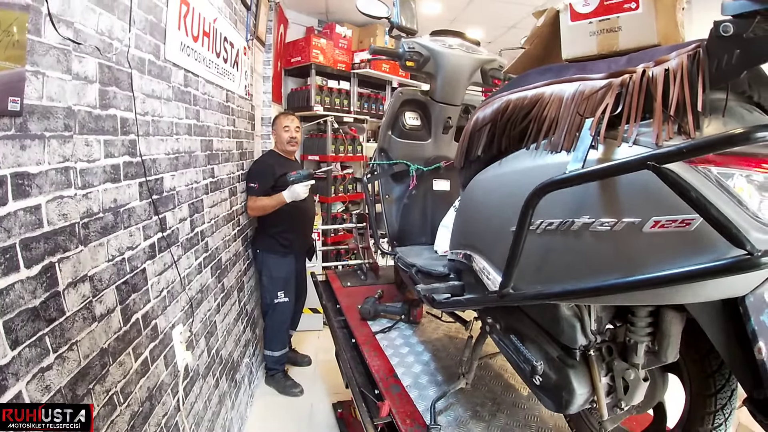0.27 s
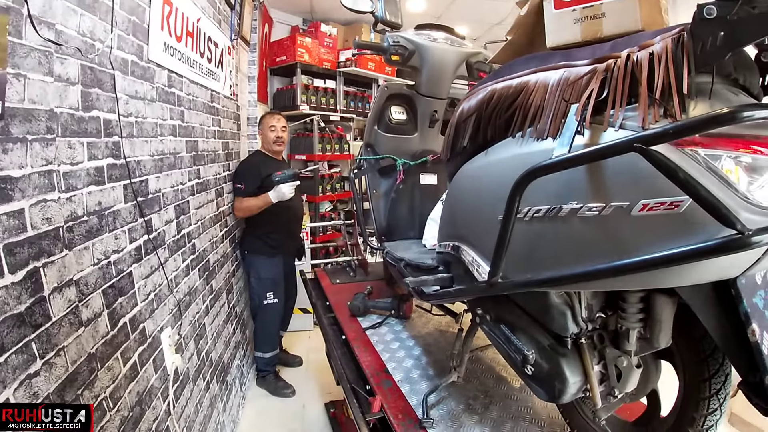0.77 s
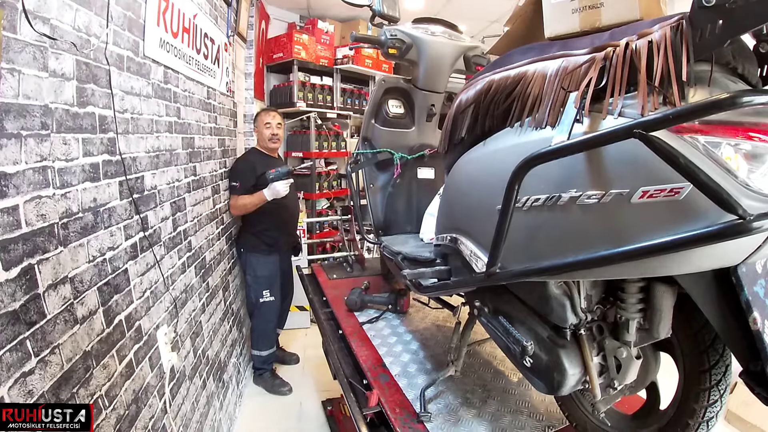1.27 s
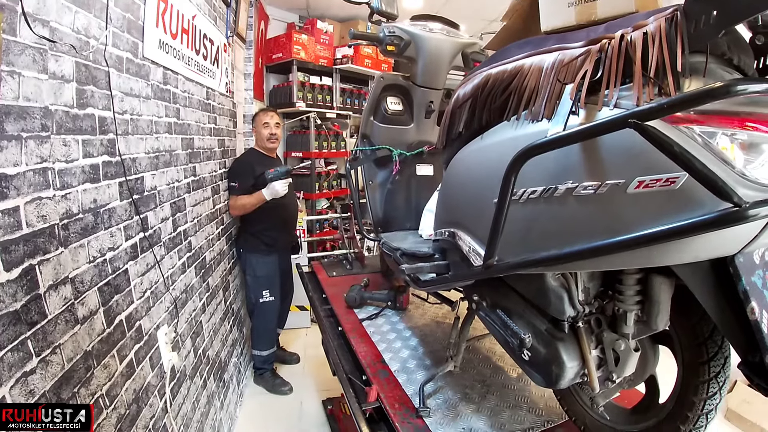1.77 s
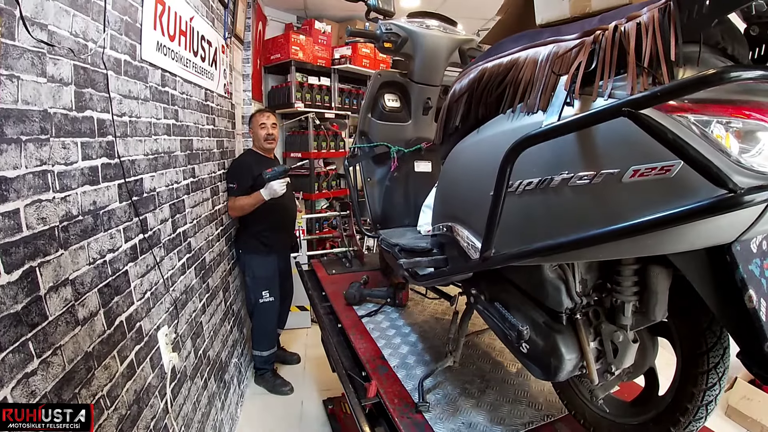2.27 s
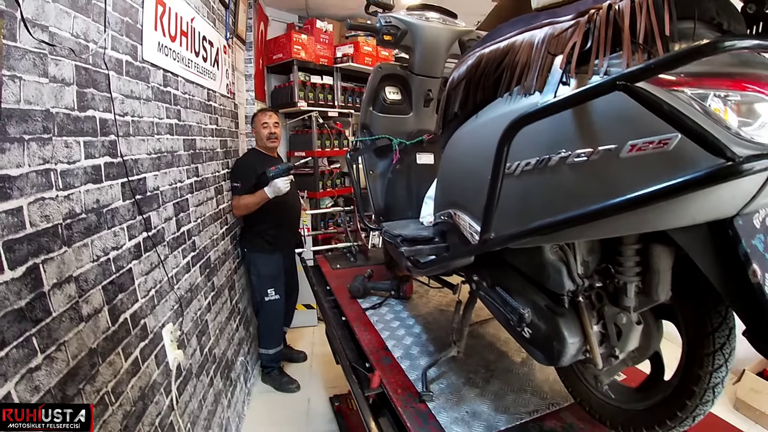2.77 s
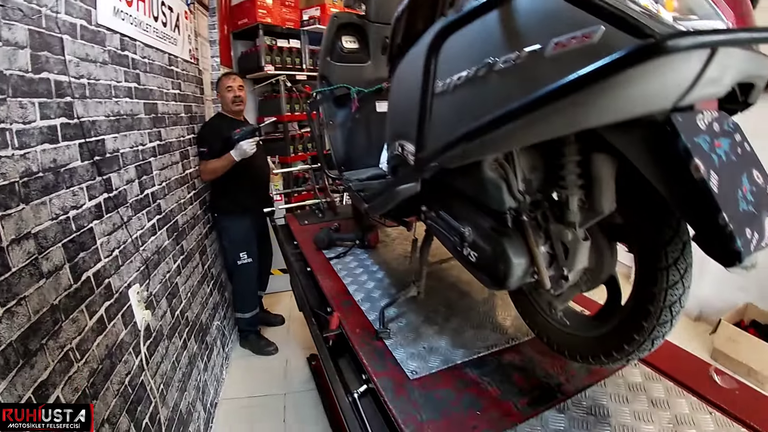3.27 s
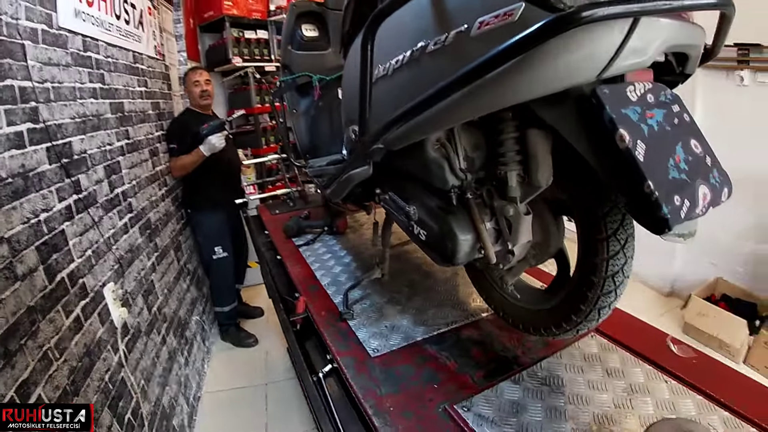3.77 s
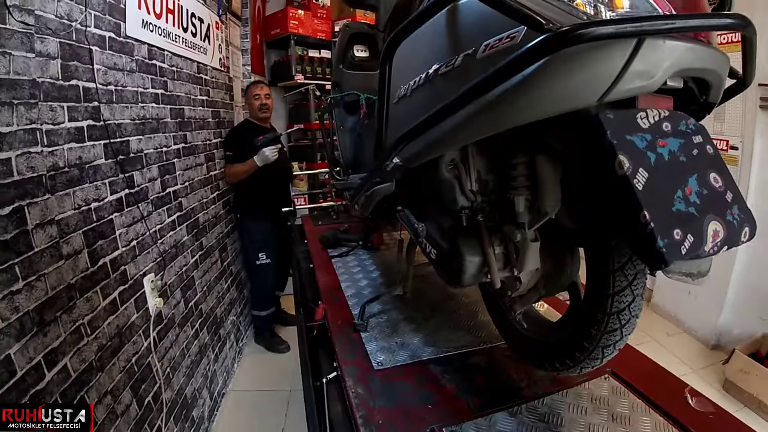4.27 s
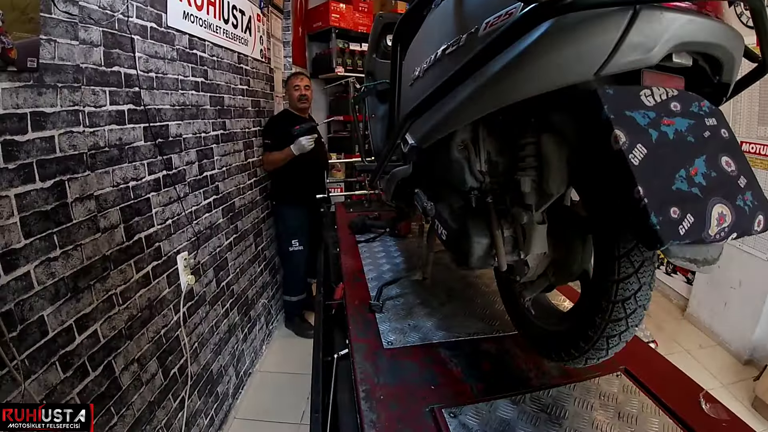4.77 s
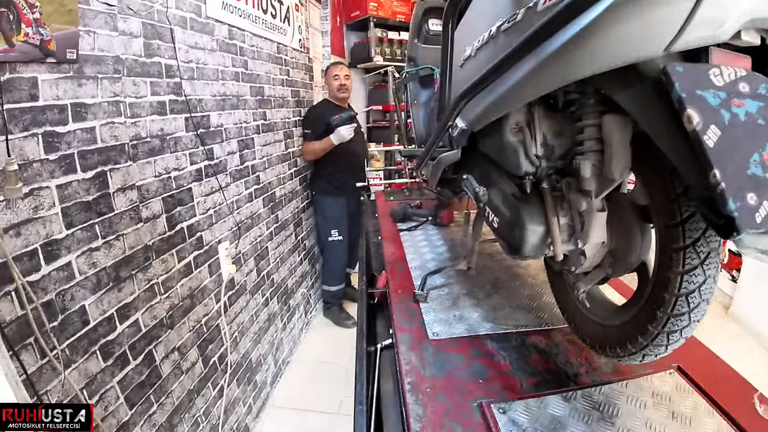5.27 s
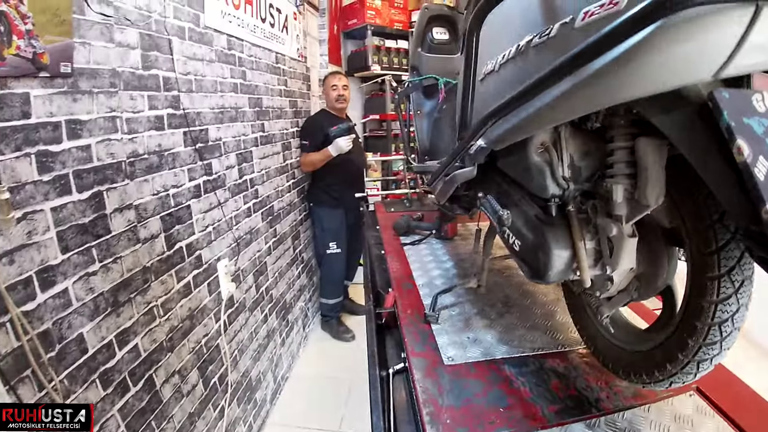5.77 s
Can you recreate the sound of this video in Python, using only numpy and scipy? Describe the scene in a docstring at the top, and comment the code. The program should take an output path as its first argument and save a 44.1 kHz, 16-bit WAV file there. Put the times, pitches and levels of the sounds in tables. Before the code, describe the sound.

In a small workshop, an electric hydraulic pump is already running and never stops. A strong low mains hum sits under a raspy, rapidly repeating gear buzz, a thin high whine and a hiss of oil. Deep rumble wavers underneath. The microphone is carried around nearby, so after about three seconds the tone colour shifts more quickly while pitch stays fixed.

```python
"""In a small workshop, the electric pump of a hydraulic lift runs steadily, raising a scooter.
The motor's iron hums at twice the mains rate and its multiples, as summed cosines. Its shaft turns a
nine-tooth gear pump: a repeated random turn makes the buzz, shaft-locked partials make the whine.
Shaped noise gives the hiss of oil, the swelling bands and a low rumble with unsteady drones.
The microphone is carried through the room's standing waves, so partials rise and dip along the way."""
import sys
import numpy as np
from scipy import signal
from scipy.fft import rfft, irfft, next_fast_len
from scipy.io import wavfile

SR = 44100
rng = np.random.default_rng(int(sys.argv[2]) if len(sys.argv) > 2 else 0)


def materialize(psi):
    """Save the field psi as 16-bit PCM at rate SR to the path in sys.argv[1].

    A 1-D psi becomes a single channel; in a 2-D psi each row is a channel.
    """
    bounded = np.clip(np.atleast_2d(psi).T, -1, 1)
    quanta = np.round(bounded * 32767).astype(np.int16)
    wavfile.write(sys.argv[1], SR, quanta)


N = 265305
TIME = np.arange(N) / SR
PADDED = next_fast_len(N)
BINS = np.fft.rfftfreq(PADDED, 1 / SR)  # Hz
SHAFT_HZ, TEETH = 24.848, 9  # mean speed of the pump shaft, teeth on its gear


def motor(mains_hz=50.0, waver_db=0.27, steady_db=0.06):
    """Magnetic pull peaks with each crest of the current; the room smears the upper partials of that pulse."""
    # hum partials at two spots in the standing waves:
    # (multiple of the mains rate, first spot [dB], second spot [dB], crossing time [s])
    hum = [(2, -24, -24.5, 4.0), (4, -23.4, -22, 4.2), (6, -45.5, -50.5, 3.4), (8, -36, -44.5, 3.94),
           (10, -40, -42, 4), (12, -53, -47, 3.9), (14, -57.5, -56.5, 3.6), (16, -48.5, -59.5, 3.93),
           (20, -51, -53.5, 4.0)]
    # faint steady-pitched upper hum: (frequency [Hz], mean level [dB])
    upper_hum = [(900, -63), (1100, -63), (1200, -66), (1300, -63), (1400, -68), (1500, -66), (1600, -69),
                 (1700, -70)]
    # nodes (-) and crests (+) that the microphone passes:
    # (time [s], half length [s], multiple of the mains rate, change [dB])
    nodes = [(0, .5, 2, -1.5), (2.5, 0.35, 14, -10), (3.3, .45, 2, 1), (3.45, 0.21, 10, -8),
             (4.0, .35, 14, 6), (4.03, 0.21, 20, -8.5), (5.5, 0.19, 16, 9.5), (5.6, .2, 2, .7)]
    angle = 2 * np.pi * mains_hz * TIME - np.pi / 2
    out = np.zeros(N)
    for order, first_db, second_db, s in hum:
        order = round(order)
        if order < 5:
            # the low partials lag a little in the heavy frame
            smear = -(order - 2) / 4
            waver = steady_db * drift(3.2)
        else:
            # the higher ones arrive ever more scattered
            smear = (order / 14) ** 2 * rng.standard_normal() + 0.12 * drift(2)
            waver = waver_db * (drift(14.0) - hunting())
        level_db = crossing(first_db, second_db, s) + passed(nodes, order) + waver
        out += amp(level_db) * np.cos(order * angle + smear)
    for hz, db in upper_hum:
        out += amp(db + 2 * drift(0.52)) * np.cos(2 * np.pi * (hz * TIME + rng.random()))
    return np.sqrt(2) * out  # table levels are rms


def hunting(hunt_hz=1.49, peak_s=0.67):
    """The rotor slips behind the field, so load and speed rock slowly to and fro."""
    return np.cos(2 * np.pi * hunt_hz * (TIME - peak_s))


def shaft_turns(depth=0.00055, jitter=0.00018):
    """Turns of the shaft since the start; hunting and chance move its speed by small fractions."""
    return np.cumsum(SHAFT_HZ * (1 + depth * hunting() + jitter * drift(5.3))) / SR


def gear_pressure(turns, once=0.077, twice=0.16):
    """Slightly eccentric gears press harder once and twice a turn."""
    return 1 + once * np.cos(2 * np.pi * turns) + twice * np.sin(2 * np.pi * 2 * turns)


def gear_buzz(turns, size=8192, count=8, steady=0.32, mesh_db=2):
    """The teeth scrape the same way on every turn; the room reweights each order as the microphone moves."""
    # buzz through the pump casing, before the tooth boost: (frequency [Hz], level [dB per Hz])
    casing = [(300, -74.5), (550, -85), (1000, -92), (1500, -88.5), (2050, -89), (2600, -84), (3100, -80.5),
              (3550, -80), (4250, -83.5), (4650, -92.5), (6700, -94), (7900, -94.5), (8700, -103.2),
              (10300, -104)]
    orders = np.arange(size // 2 + 1)  # multiples of the shaft rate
    gain = colour(casing, orders * SHAFT_HZ)
    gain *= amp(mesh_db * (orders % TEETH == 0))
    # nothing up to the tooth rate, and a steep upper edge in Hz
    gain *= (orders > TEETH) / (1 + (orders * SHAFT_HZ / 10800) ** 40)
    travelled = path()

    def play(pattern):
        """Repeats one turn of the shaft."""
        turn = irfft(gain * pattern, size) * size * np.sqrt(SHAFT_HZ / 2)
        return np.interp(turns % 1 * size, np.arange(size + 1), np.append(turn, turn[0]))

    direct = play(np.exp(2j * np.pi * rng.random(len(orders))))
    diffuse = np.zeros(N)
    for place in range(count):
        real, imaginary = rng.standard_normal((2, len(orders))) / np.sqrt(2)
        diffuse += nearness(travelled, place) * play(real + 1j * imaginary)
    return np.sqrt(steady) * direct + np.sqrt(1 - steady) * diffuse  # steady: share of power


def gear_whine(turns, trim_db=-0.5, fade_db=2.2, count=24):
    """Tooth-mesh partials and their neighbours, locked to the shaft, fading faster as the microphone moves faster."""
    # partials at two spots, before the trim, most on multiples of the tooth rate:
    # (multiple of the shaft rate, first spot [dB], second spot [dB], crossing time [s])
    whine = [(9, -42.5, -47, 3.3), (99, -73, -63.5, 3.8), (108, -61, -71, 2.8), (117, -60, -63, 2.4),
             (126, -66, -59.5, 3.2), (135, -63, -62, 3.0), (141, -64, -65, 3.0), (144, -58, -62, 2.2),
             (149, -65, -66, 4.0), (171, -73, -70, 3.5)]
    # crests that the microphone passes: (time [s], half length [s], multiple of the shaft rate, rise [dB])
    crests = [(1.45, .3, 144, 4), (3.75, .3, 141, 11), (4.1, .3, 126, 4), (5.4, .3, 171, 14),
              (5.65, .25, 149, 12)]
    out = np.zeros(N)
    steps = 3 * path()  # the whine's standing waves are short
    for order, first_db, second_db, s in whine:
        fade = fade_db * np.interp(steps, np.arange(count), rng.standard_normal(count))
        level_db = trim_db + crossing(first_db, second_db, s) + passed(crests, order) + fade
        out += amp(level_db) * np.cos(2 * np.pi * (order * turns + rng.random()))
    return np.sqrt(2) * out


def oil(turns, throb=0.18, flicker_db=0.5):
    """Oil hisses through the pump in spurts, one for each tooth."""
    # mean colour of the hiss: (frequency [Hz], level [dB per Hz])
    flow = [(150, -74.5), (250, -77.5), (420, -69), (560, -73.5), (780, -77), (950, -79), (1400, -81),
            (2000, -86.5), (3000, -87.5), (4200, -92), (4700, -94), (7700, -94), (8700, -104.5),
            (10400, -106.5), (11300, -117), (14000, -122)]
    spurts = 1 + throb * np.cos(2 * np.pi * TEETH * turns)
    return noise(colour(flow, BINS)) * spurts * amp(flicker_db * drift(25))


def near_walls(x, count=16, echoes=6):
    """Echoes off wall, deck and scooter comb the treble, differently at each half step of the path."""
    travelled = 2 * path()
    spectrum = rfft(x, PADDED)
    share = 0.24 / (1 + (2800 / (BINS + 1)) ** 4)  # echoed share of the power, mostly treble
    out = irfft(spectrum * np.sqrt(1 - share), PADDED)[:N]
    for place in range(count):
        taps = np.zeros(PADDED)
        delays = rng.integers(SR // 600, SR // 90, echoes)  # samples
        taps[delays] = rng.choice([-1, 1], echoes) / np.sqrt(echoes)
        echoed = irfft(spectrum * np.sqrt(share) * rfft(taps), PADDED)[:N]
        out += nearness(travelled, place) * echoed
    return out


def swells():
    """Hiss settles after the start of the stroke; other bands of noise swell for a moment as the lift rises."""
    # (time [s], half length [s], frequency [Hz], width [Hz], peak level [dB])
    bands = [(.2, .08, 6400, 1500, -56.5), (2.3, 0.56, 1247, 10, -55.5), (2.5, .25, 6800, 130, -63),
             (3.2, .3, 3750, 460, -59), (4.4, 0.59, 3370, 300, -58), (4.4, .5, 350, 50, -53),
             (5.3, 0.55, 4150, 330, -63.5), (5.4, 0.67, 6940, 1700, -59), (5.7, .5, 1630, 250, -59.5)]
    out = amp(-46) * swell(0, half=0.35) * ring(2600, width=2700)  # hiss dying away
    for s, half, hz, width, db in bands:
        out += amp(db) * swell(s, half) * ring(hz, width)
    return out


def rumble(upper_db=1.5, upper_db_per_s=-0.43, lump_db=1.14, lump_hz=5.8):
    """Low noise and drones come in slow, random lumps; the upper part eases steadily."""
    # broad bed, before the moving levels: (frequency [Hz], level [dB per Hz])
    bed_colour = [(8, -91), (20, -75.5), (30, -63), (50, -64), (80, -57.5), (120, -61), (180, -66.5),
                  (230, -66.5), (300, -100), (800, -150)]
    # drones, before the moving levels: (frequency [Hz], pitch wander [Hz], level [dB])
    drone_rows = [(36.7, 4, -43), (63, 2, -42.5), (82.2, 5, -45.5), (116.5, 1, -50.5), (127.8, 1.1, -49),
                  (147.8, 4, -49), (166.3, 1, -44), (274.5, 4, -59), (314.4, 1.55, -64.5),
                  (403.8, 0.85, -53.5), (433, 1.2, -66), (534.6, 3, -55.5), (578, 8.06, -58.5),
                  (783, 14, -57)]
    # moving level of the deep part: (time [s], level [dB])
    deep_level = [(0, 2), (.25, 5), (1.1, 1.5), (1.35, 1), (2.65, .5), (3.15, -4), (3.55, 3.5), (4.2, -3),
                  (6, -4)]
    deep = amp(curve(deep_level) + lump_db * drift(lump_hz))
    upper = amp(upper_db + upper_db_per_s * TIME + lump_db * drift(lump_hz))
    bed = colour(bed_colour, BINS)
    below = 1 / (1 + (BINS / 90) ** 6)  # share of the power in the deep part
    out = deep * noise(bed * np.sqrt(below)) + upper * noise(bed * np.sqrt(1 - below))
    for hz, wander, db in drone_rows:
        out += amp(db) * drone(hz, wander) * (deep if hz < 100 else upper)
    return out


def drone(hz, wander, waver_db=2):
    """A tone whose pitch and strength wander, rms one."""
    turns = np.cumsum(hz + wander * drift(6)) / SR + rng.random()
    return unit(amp(waver_db * drift(4)) * np.cos(2 * np.pi * turns))


def path():
    """How many changes of the sound field the microphone has passed through."""
    # speed of the microphone: (time [s], rate [sound field changes per s])
    walk = [(0, 0.52), (2.5, 0.5), (3, 1.55), (4.3, 1.45), (5, 0.96), (6, 1.35)]
    return np.cumsum(curve(walk)) / SR


def nearness(travelled, place):
    """Weight of one place along the path; the squares of neighbouring weights sum to one."""
    return np.cos(np.pi / 2 * np.clip(travelled - place, -1, 1))


def crossing(first_db, second_db, s, cross_s=0.34):
    """Level of a partial in dB as the microphone is carried from the first spot to the second."""
    return first_db + (second_db - first_db) * (1 + np.tanh((TIME - s) / cross_s)) / 2


def passed(rows, order):
    """Rise or dip in dB of one partial at the crests and nodes along the way."""
    return sum(db * swell(s, half) for s, half, partial, db in rows if round(partial) == order)


def swell(s, half):
    """A smooth bell-shaped rise and fall around the time s."""
    return np.exp(-((TIME - s) / half) ** 2 / 2)


def amp(db):
    """Decibels to gain."""
    return 10 ** (np.asarray(db) / 20)


def unit(x):
    """Scales to an rms of one."""
    return x / np.sqrt(np.mean(x ** 2) + 1e-20)


def curve(rows):
    """Points joined by straight lines in time."""
    return np.interp(TIME, *np.transpose(rows))


def colour(points, hz):
    """Gain of a spectrum at the given frequencies, its dB joined by lines over log frequency."""
    f, db = np.transpose(points)
    return amp(np.interp(np.log(hz + 1), np.log(f + 1), db))


def noise(gain):
    """Noise with the given amplitude per root Hz."""
    return irfft(rfft(rng.standard_normal(PADDED)) * gain, PADDED)[:N] * np.sqrt(SR / 2)


def ring(hz, width):
    """Noise in one steep resonance, rms one."""
    return unit(noise(1 / (1 + ((BINS - hz) / width) ** 2) ** 2))


def drift(rate):
    """Slow chance up to about the given rate in Hz, rms one."""
    return unit(noise(np.exp(-(BINS / rate) ** 2)))


def scene():
    """Hum, pump and rumble at one microphone."""
    turns = shaft_turns()
    pump = gear_pressure(turns) * gear_buzz(turns) + oil(turns)
    mix = motor() + near_walls(pump) + gear_whine(turns) + swells() + rumble()
    return mix[None]


def record(dry):
    """The recorder's band limit, a linear-phase low-pass filter."""
    lowpass = signal.firwin(511, 14500, window=("kaiser", 9), fs=SR)  # edge in Hz
    return signal.oaconvolve(dry, lowpass[None], "same")


dry = scene()
out = record(dry)
materialize(out)
```